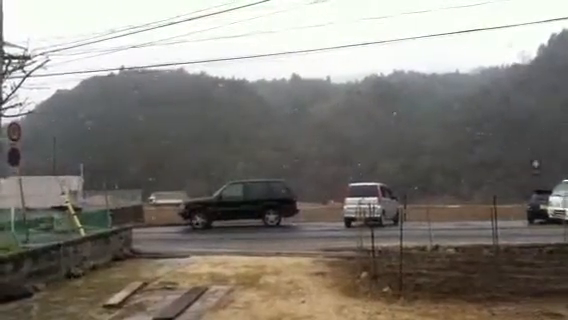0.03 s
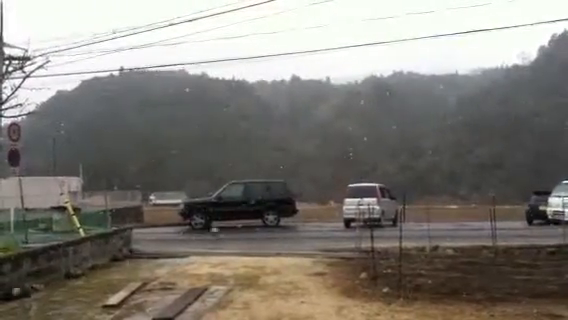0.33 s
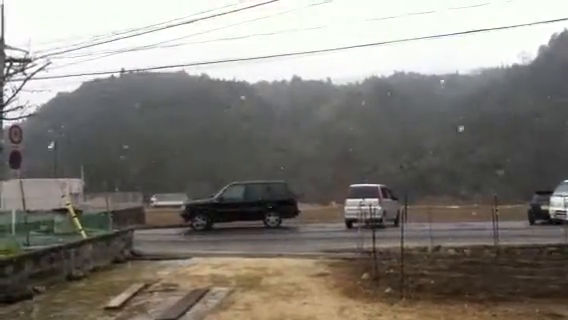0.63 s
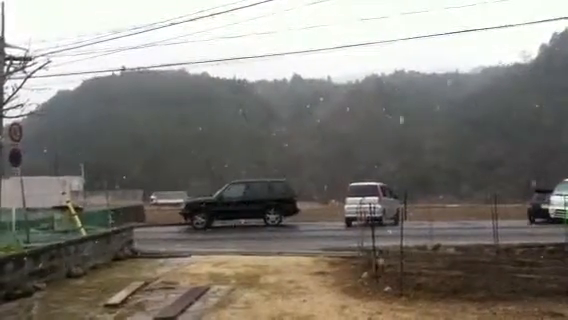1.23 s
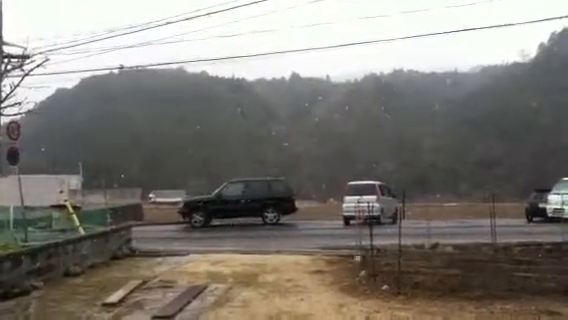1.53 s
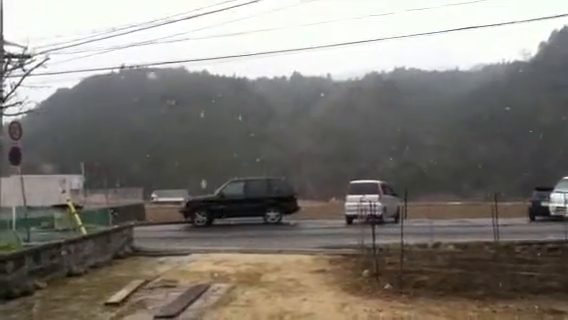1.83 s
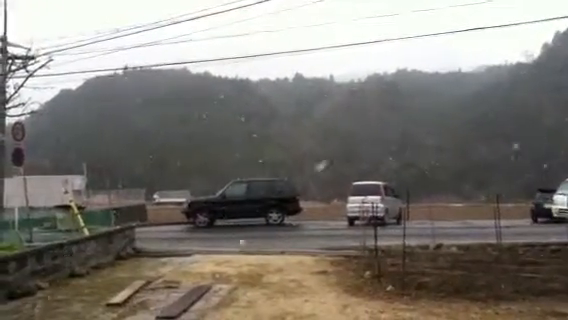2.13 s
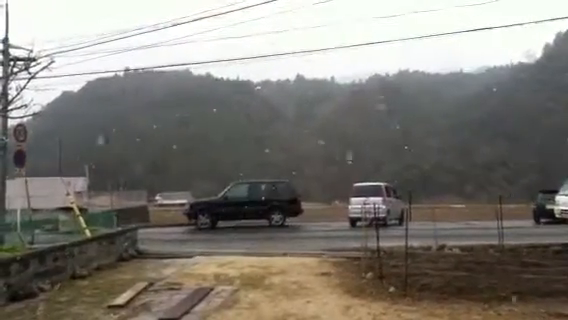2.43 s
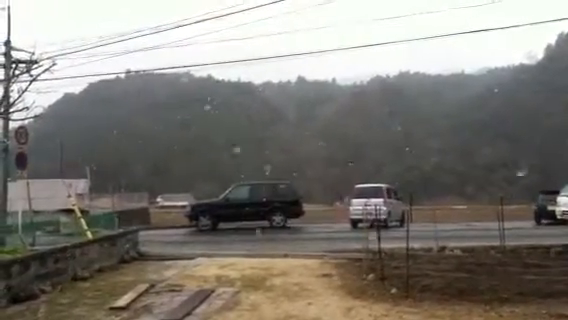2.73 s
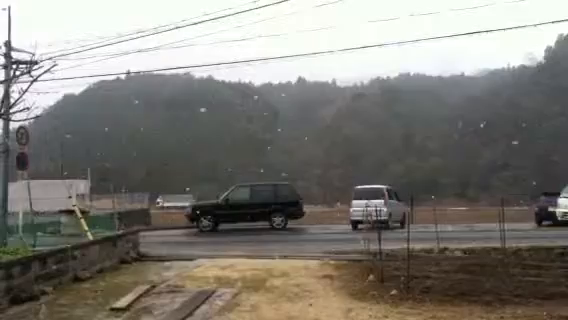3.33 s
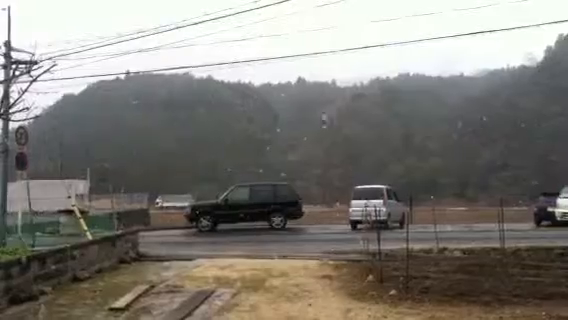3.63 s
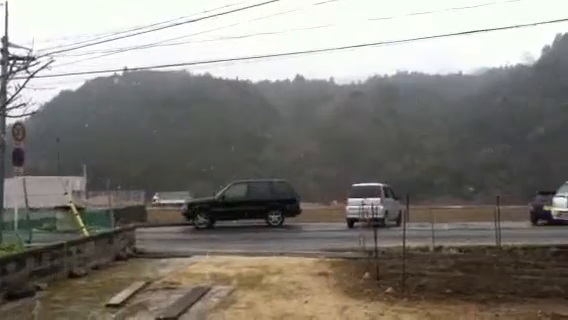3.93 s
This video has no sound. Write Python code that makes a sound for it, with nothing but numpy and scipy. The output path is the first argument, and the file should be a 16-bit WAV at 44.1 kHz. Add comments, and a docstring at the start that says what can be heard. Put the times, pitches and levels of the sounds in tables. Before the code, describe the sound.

Wind hits the microphone in low, rumbling bursts that grow stronger, drop to a lull and pick up again near the end. Behind it, a soft outdoor hiss and faint ticks of falling snow fill a quiet rural roadside.

```python
"""A country road in falling snow, with light wind on a bare microphone.
Gusts flutter against the port, brightest at their peaks, and single eddies thump on it. Behind them lie
a faint outdoor hiss, tiny ticks (likely snowflakes landing), one faint chirr and a thin electronic whine.
The hardest thump makes a limiter duck everything; the hiss then creeps back."""
import sys
import numpy as np
from scipy import signal
from scipy.fft import rfft, irfft
from scipy.io import wavfile
from scipy.ndimage import uniform_filter1d, minimum_filter1d

SR = 44100
rng = np.random.default_rng(int(sys.argv[2]) if len(sys.argv) > 2 else 0)


def generate_wav(signal):
    """Clip the signal to [-1, 1] and save it as 16-bit WAV at the path in sys.argv[1]."""
    frames = np.transpose(np.atleast_2d(signal))
    scaled = np.clip(frames, -1, 1) * 32767
    pcm = np.round(scaled).astype(np.int16)
    wavfile.write(sys.argv[1], SR, pcm)


N = 176400
TIME, BIN_HZ = np.arange(N) / SR, np.arange(N // 2 + 1) * SR / N


def from_db(db):
    """Decibels to gain."""
    return 10 ** (np.asarray(db) / 20)


def unit_rms(x):
    """Scale to an rms of 1."""
    return x / np.sqrt(np.mean(x ** 2) + 1e-20)


def eq_gain(curve, hz):
    """Gain of an EQ curve, read on a log-frequency axis."""
    curve_hz, curve_db = np.array(curve).T
    return from_db(np.interp(np.log(hz + 1e-9), np.log(curve_hz), curve_db))


def drift(rate_hz):
    """Smooth random wander with a spread of 1."""
    return unit_rms(irfft(rfft(rng.standard_normal(N)) / (1 + (BIN_HZ / rate_hz) ** 2), N))


def noise_band(hz, width, size=N):
    """Noise around a pitch; the width is a share of that pitch."""
    edges_hz = np.clip([hz / (1 + width / 2), hz * (1 + width / 2)], 10, SR / 2 - 100)
    band_pass = signal.butter(2, edges_hz, "band", fs=SR, output="sos")
    return unit_rms(signal.sosfilt(band_pass, rng.standard_normal(size)))


def outdoor_hiss():
    """A smooth bed of far hiss with a few brief swells in the treble."""
    # tone of the bed: frequency_hz, gain_db
    hiss_eq = [(30, -5), (120, -10), (400, 1), (800, -2), (1300, -3.5), (2800, -8), (5500, -10.5),
               (9500, -11.5), (13000, -16.5), (15500, -26)]
    # treble swells: peak_s, level_db, centre_hz
    swells = [(.57, -66, 7500), (.70, -61, 5230), (3.06, -58.5, 6738)]
    bed_db, swell_half_s = -59, 0.03
    bed = unit_rms(irfft(rfft(rng.standard_normal(N)) * eq_gain(hiss_eq, BIN_HZ), N))
    out = from_db(bed_db) * bed
    for peak_s, level_db, centre_hz in swells:
        envelope = 1 / (1 + ((TIME - peak_s) / swell_half_s) ** 2)
        out += from_db(level_db) * envelope * noise_band(centre_hz, width=0.5)
    return out


def electronic_whine(pitch_hz=14994, level_db=-67):
    """A steady thin tone from a camera's electronics."""
    return from_db(level_db) * np.sin(2 * np.pi * pitch_hz * TIME)


def chirr():
    """A faint rattle: quick pulses in two narrow resonances and a broad rasp grow, then stop short."""
    # bands of the chirr: strongest_pulse_s, pitch_hz, level_db, width (share of the pitch)
    bands = [(1.15, 2450, -56.5, .14), (1.143, 3780, -57, .14), (1.162, 4800, -60, .7)]
    pulses_per_s, rise_s, fall_s = 37.8, 0.11, 0.036
    out = np.zeros(N)
    for strongest_pulse_s, pitch_hz, level_db, width in bands:
        t = TIME - strongest_pulse_s
        envelope = np.exp(np.minimum(t / rise_s, -t / fall_s))
        pulses = np.cos(np.pi * pulses_per_s * t) ** 4
        out += from_db(level_db) * envelope * pulses * noise_band(pitch_hz, width)
    return out


def snow_ticks():
    """Tiny impacts, each a short puff of narrow noise: a few clear ones among many faint ones."""
    # clear impacts: start_s, level_db, pitch_hz
    clear_ticks = [(.558, -56, 6470), (1.217, -57.5, 9200), (1.384, -54, 10100), (1.485, -54, 5730),
                   (1.773, -53, 5000), (2.115, -55.5, 5230), (2.309, -56.5, 8530), (2.483, -53, 9750),
                   (2.593, -56, 5870), (2.657, -57, 4700), (2.868, -58.5, 7900), (3.048, -49.5, 4320),
                   (3.079, -58, 6600), (3.244, -56, 9100), (3.48, -57, 6300)]
    faint_per_s, faint_db, spread_db = 8.1, -64, 3
    attack_s, decay_s = 0.001, 0.0074
    draws = rng.random((int(faint_per_s * N / SR), 3))
    faint_ticks = [(when * N / SR, faint_db + spread_db * (2 * strength - 1), 3500 * 3 ** pitch)
                   for when, strength, pitch in draws]
    age = TIME[:SR // 10]
    envelope = np.minimum(age / attack_s, 1) * np.exp(-age / decay_s)
    out = np.zeros(N + SR)
    for start_s, level_db, pitch_hz in clear_ticks + faint_ticks:
        start = int(start_s * SR)
        puff = envelope * noise_band(pitch_hz, width=0.2, size=len(age))
        out[start:start + len(age)] += from_db(level_db) * puff
    return out[:N]


def gusts():
    """Turbulence at the port: each gust has its own brightness; flutter lifts level and treble together."""
    # gusts of wind: peak_s, level_db, half_length_s, roll_off_hz
    gust_peaks = [(0.153, -33.5, 0.028, 139), (0.227, -23.5, 0.0063, 175), (0.274, -26.5, 0.017, 114),
                  (0.405, -33.5, 0.012, 93), (0.605, -28.5, 0.021, 137), (0.731, -20.5, 0.018, 135),
                  (0.787, -21.5, 0.011, 124), (0.821, -30.5, 0.018, 99), (0.908, -27, 0.025, 111),
                  (0.934, -33, 0.034, 87), (1.12, -34.5, 0.023, 75.6), (1.183, -27.5, 0.027, 126),
                  (1.245, -15.5, 0.007, 209), (1.296, -26, 0.016, 110), (1.375, -19, 0.018, 248),
                  (1.411, -15, .014, 190), (1.49, -18, 0.014, 149), (1.524, -15.5, 0.0057, 230),
                  (1.554, -8.5, 0.0072, 650), (1.6146, -9, 0.0033, 1770), (1.626, -12, 0.007, 239),
                  (1.674, -20, 0.027, 179), (2.16, -35, 0.02, 150), (2.273, -46, 0.014, 77.4),
                  (2.488, -39, 0.019, 98.5), (3.475, -18.5, 0.0083, 237), (3.501, -23.5, 0.013, 170),
                  (3.55, -18, 0.0076, 250), (3.639, -36, 0.036, 146), (3.771, -34.5, 0.031, 122)]
    # tone of the airflow ahead of the roll-off: frequency_hz, gain_db
    flow_eq = [(20, -25), (45, -15.5), (90, 0.5), (140, 6.5), (300, 3), (750, -0.5), (1400, -4.5),
               (2300, -20.5), (3500, -35)]
    breeze_db, breeze_roll_off_hz = -54.5, 54   # the air between gusts
    fall_db_per_half_length, fall_db_per_octave = 7.5, 16.5   # a gust's flanks fade and darken
    flutter_db, flutter_octaves = 6, 0.74
    power = from_db(breeze_db) ** 2
    weighted_hz = power * breeze_roll_off_hz
    for peak_s, level_db, half_length_s, roll_off_hz in gust_peaks:
        flank_db = -fall_db_per_half_length * (np.hypot(1, (TIME - peak_s) / half_length_s) - 1)
        gust_power = from_db(level_db + flank_db) ** 2
        power += gust_power
        weighted_hz += gust_power * roll_off_hz * 2 ** (flank_db / fall_db_per_octave)
    flutter = np.tanh(drift(rate_hz=78))
    moving_roll_off_hz = weighted_hz / power * 2 ** (flutter_octaves * flutter)
    # a moving low-pass, built from half-octave bands of noise
    white, bin_octaves = rfft(rng.standard_normal(N)), np.log2(BIN_HZ + 1e-9)
    rumble, rumble_power = 0, 0
    for band_hz in 20 * 2 ** np.arange(0, 8, 0.5):
        band = np.maximum(1 - 2 * abs(bin_octaves - np.log2(band_hz)), 0)
        gain = eq_gain(flow_eq, band_hz) * np.exp(-band_hz / moving_roll_off_hz)
        rumble += gain * irfft(white * band, N)
        rumble_power += gain ** 2 * band.mean()
    return from_db(flutter_db * flutter) * rumble * np.sqrt(power / rumble_power)


def eddies():
    """Passing vortices: suction between two shoulders of pressure; each has its own strength and pitch."""
    # thumps on the port: peak_s, suction_db, centre_hz
    thumps = [(0.058, -15.5, 134), (.238, -14.5, 221), (.278, -17.5, 227), (0.4824, -10, 220),
              (0.619, -9.5, 278), (0.713, -14, 145), (.735, -12.5, 403), (.751, -13.5, 238),
              (0.801, -9.5, 147), (.885, -13.5, 196), (0.921, -13.5, 510), (.935, -15, 151),
              (1.167, -10, 283), (1.243, -2, 167), (1.256, -10.5, 400), (1.331, -8, 197), (1.343, -8, 225),
              (1.3715, -10, 343), (1.383, -4.5, 354), (1.402, -11, 630), (1.406, 5.5, 598), (1.41, -2, 196),
              (1.424, -5.5, 520), (1.542, -4, 193), (1.55, -4.5, 560), (1.5577, -8, 790),
              (1.567, -11.5, 495), (1.61, -5, 598), (1.614, 2.5, 696), (1.619, 3.5, 289),
              (1.6289, -5.5, 354), (1.672, -12, 396), (2.161, -20.5, 245), (2.505, -19, 145),
              (2.74, -28.5, 144), (2.777, -30, 113), (2.847, -33, 117), (3.133, -19.5, 158),
              (3.223, -30, 150), (3.481, -8, 270), (3.551, -13.5, 540), (3.681, -17, 310),
              (3.721, -14, 191), (3.811, -19, 118)]
    out = np.zeros(N)
    for peak_s, suction_db, centre_hz in thumps:
        distance_sq = ((TIME - peak_s) * centre_hz * 4 * np.pi / 7) ** 2   # from vortex core to port
        suction = (1 - 6 * distance_sq + distance_sq ** 2) / (1 + distance_sq) ** 4
        out -= from_db(suction_db) * suction
    return out


def scene():
    """Wind at the port, thinned in the deep bass, over the quiet background; mono."""
    port_low_cut = signal.butter(1, 33, "high", fs=SR, output="sos")
    wind = signal.sosfilt(port_low_cut, gusts() + eddies())
    return (wind + outdoor_hiss() + snow_ticks() + chirr() + electronic_whine())[None]


def record(dry):
    """A limiter ducks at once and recovers slowly; a steep low-pass cuts the top."""
    threshold_db, attack_s, release_s, cutoff_hz = -3, 0.0014, 1.04, 15750
    over_db = np.maximum(20 * np.log10(abs(dry[0]) + 1e-9) - threshold_db, 0)
    release, attack_samples = np.exp(-TIME / release_s), int(attack_s * SR)
    duck_db = -np.maximum.accumulate(over_db / release) * release
    smooth_duck_db = uniform_filter1d(minimum_filter1d(duck_db, attack_samples), attack_samples)
    high_cut = signal.ellip(12, 0.1, 80, cutoff_hz, fs=SR, output="sos")
    return signal.sosfilt(high_cut, dry * from_db(smooth_duck_db))


dry = scene()
out = record(dry)
generate_wav(out)
```